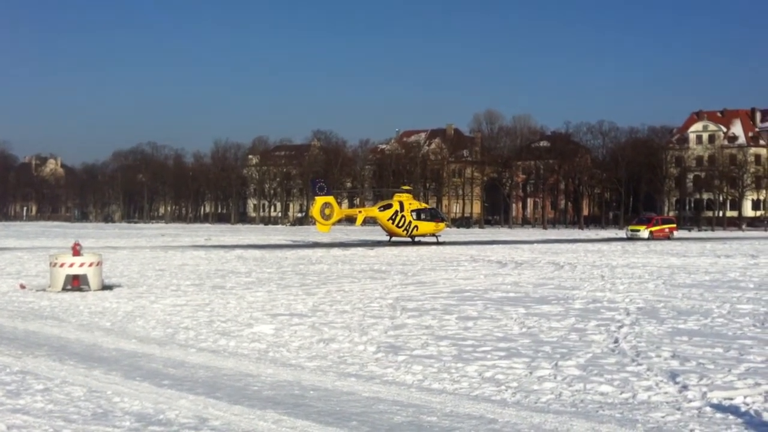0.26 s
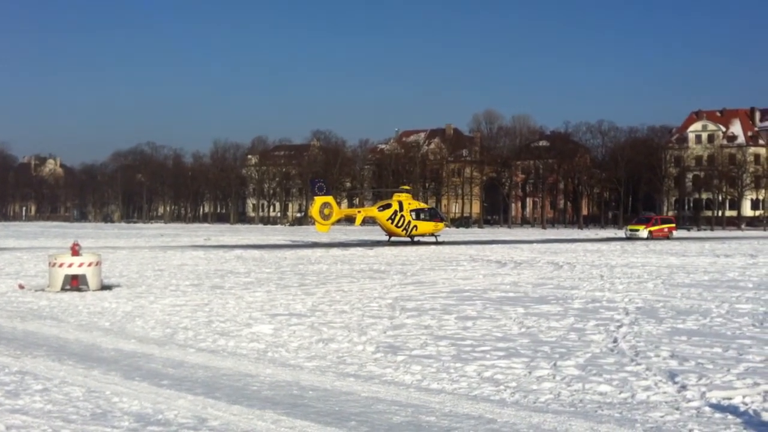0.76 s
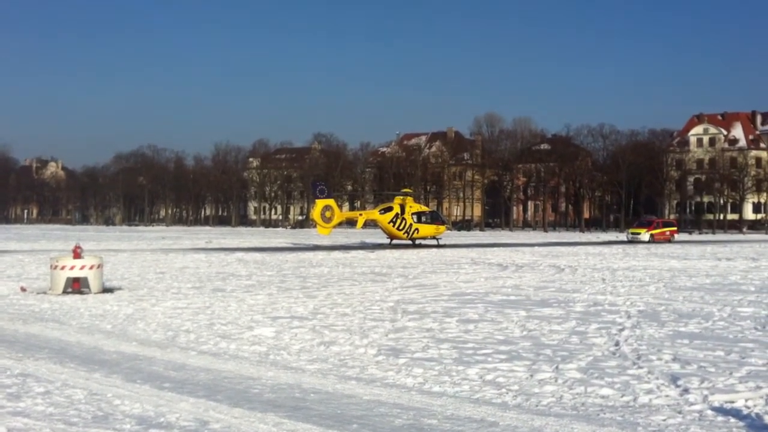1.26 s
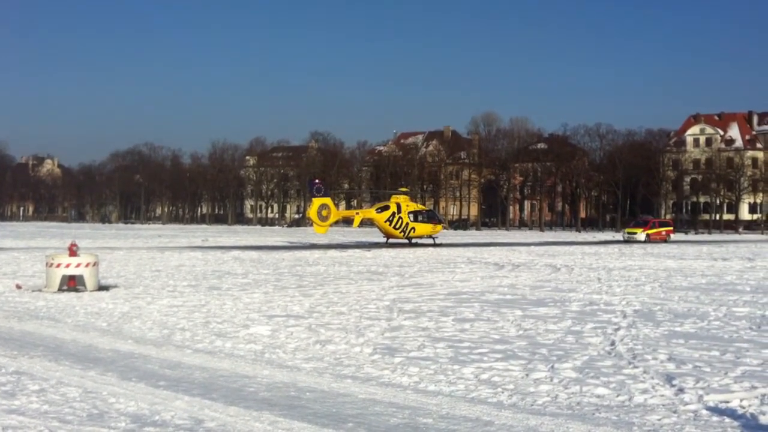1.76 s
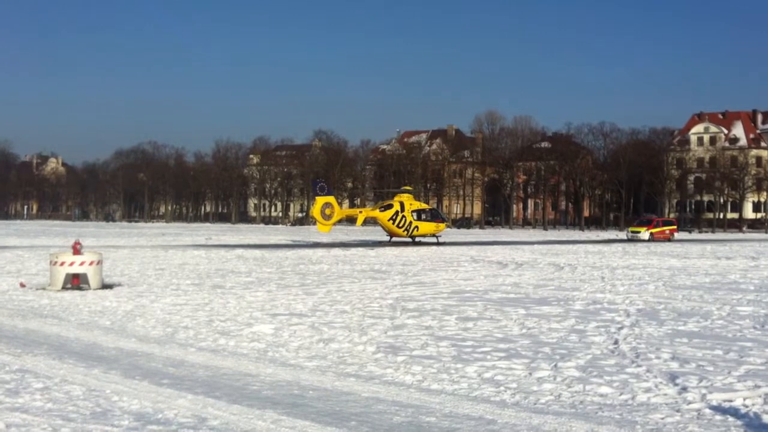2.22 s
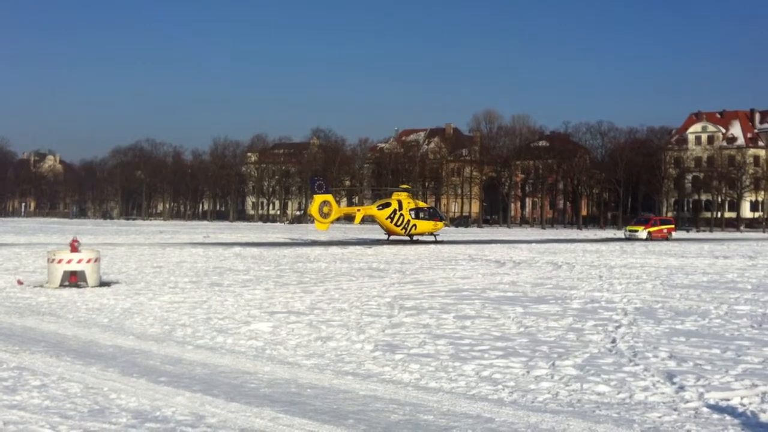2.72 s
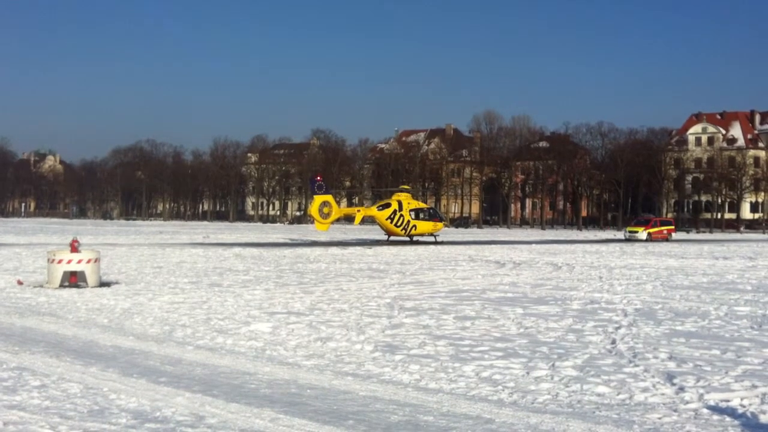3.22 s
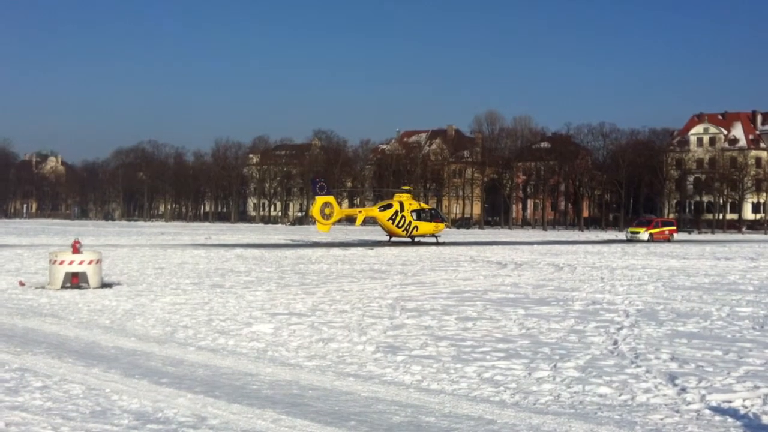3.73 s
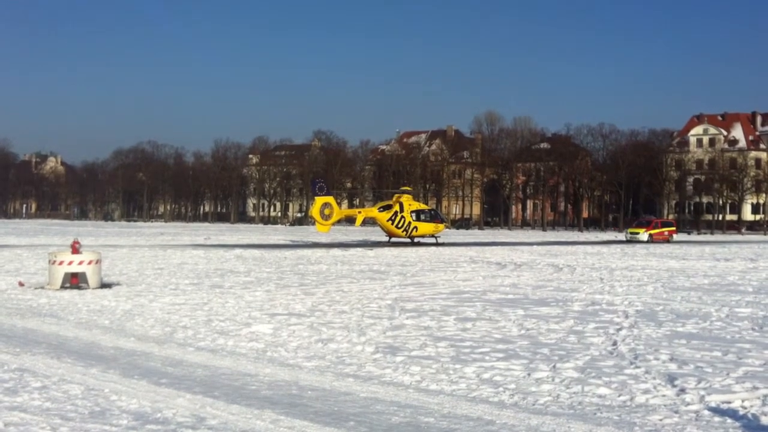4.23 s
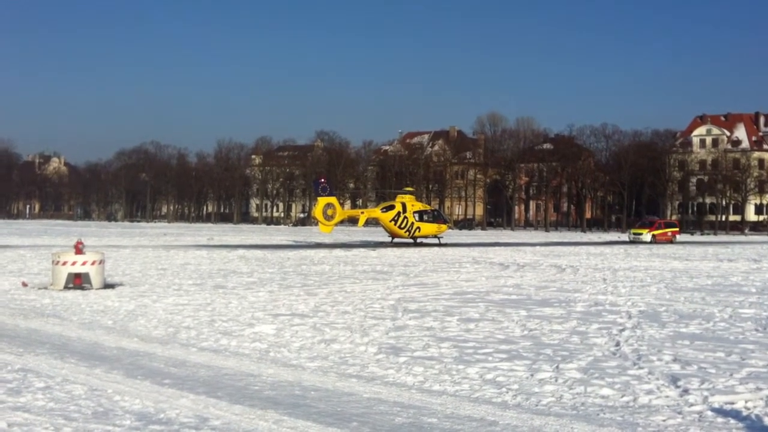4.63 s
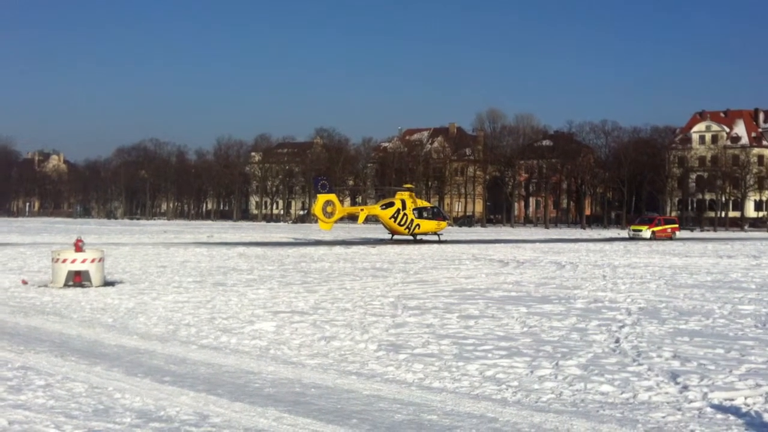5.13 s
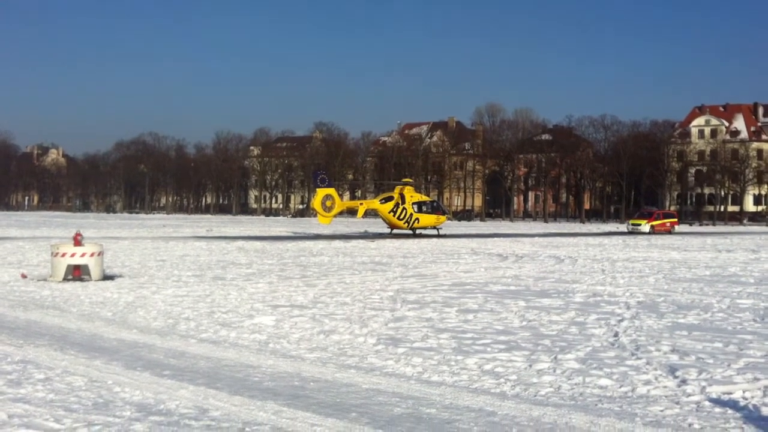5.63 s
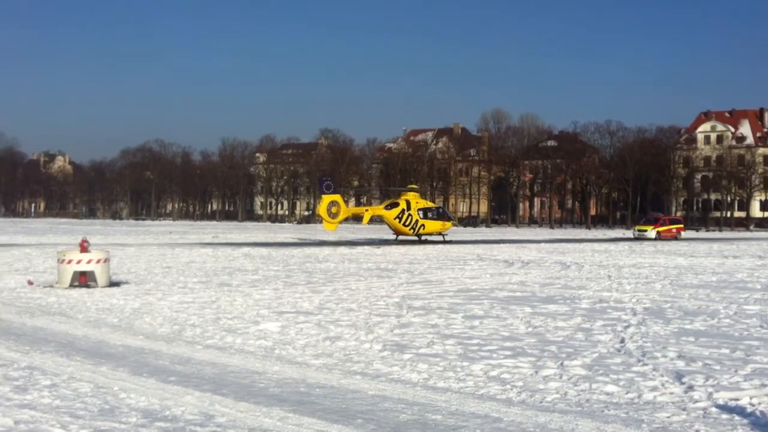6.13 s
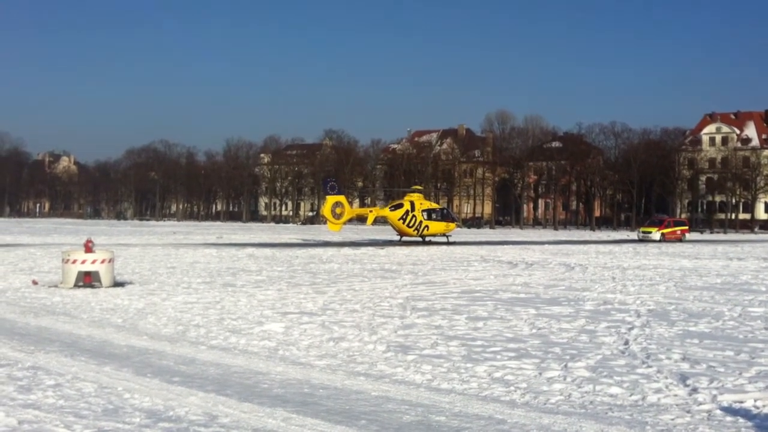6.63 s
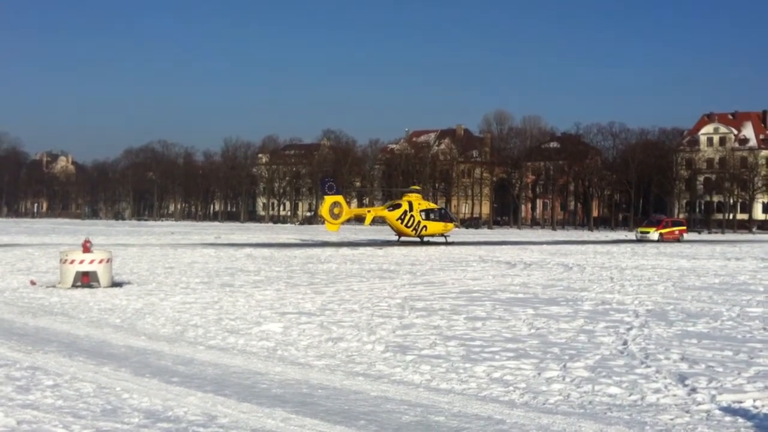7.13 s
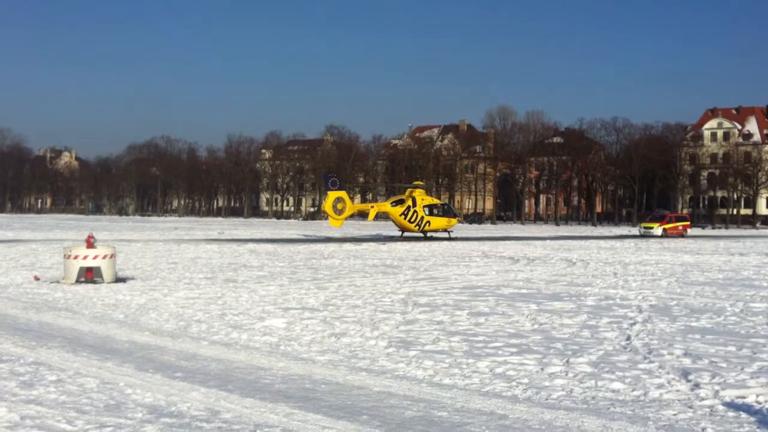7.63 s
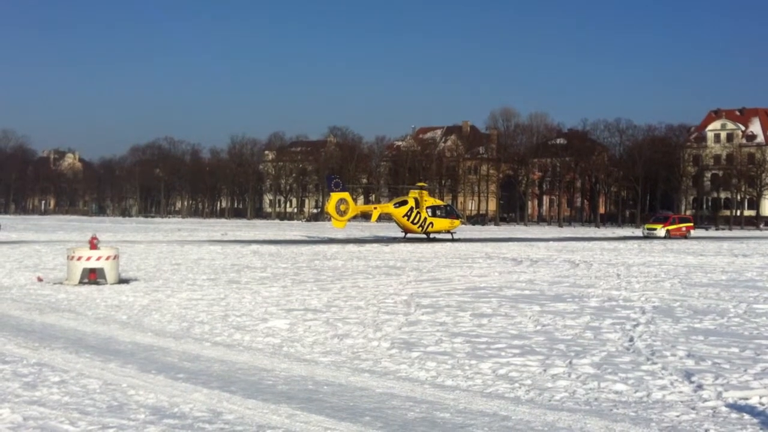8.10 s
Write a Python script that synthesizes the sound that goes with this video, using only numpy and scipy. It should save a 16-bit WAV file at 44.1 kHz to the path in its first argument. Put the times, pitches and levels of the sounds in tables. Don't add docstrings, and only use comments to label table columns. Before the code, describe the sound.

Far-off jet engine roar and hiss grow steadily as a helicopter winds up outdoors, with short low wind bumps in the second half.

```python
import sys
import numpy as np
from scipy import signal
from scipy.fft import rfft, irfft, next_fast_len
from scipy.io import wavfile
from scipy.ndimage import uniform_filter1d

SR = 44100
rng = np.random.default_rng(int(sys.argv[2]) if len(sys.argv) > 2 else 0)


def voltage_ratio(level):
    return 10 ** (np.asarray(level, float) / 20)


def digitize_waveform(pressure):
    field = np.atleast_2d(pressure).T
    bounded = np.clip(field, -1, 1)
    quanta = np.round(bounded * 32767).astype(np.int16)
    wavfile.write(sys.argv[1], SR, quanta)


N = 368676
T = np.arange(N) / SR
FROM_MIDDLE = (np.arange(N) - N / 2) / SR


def rms_one(x):
    return x / np.sqrt(np.mean(x ** 2) + 1e-20)


def in_time(rows):
    s, *columns = np.transpose(rows)
    return [np.interp(T, s, c) for c in columns]


def drift(rate):
    coarse = 40
    r = np.exp(-2 * np.pi * rate * coarse / SR)
    draws = rng.standard_normal(N // coarse + 2002)
    slow = signal.lfilter([1], [1, -2 * r, r * r], draws)[2000:]
    return np.interp(np.arange(N) / coarse, np.arange(len(slow)), rms_one(slow))


def air_noise(spectrum, shared_db, patchy_db, rate, count):
    size = next_fast_len(N)
    hz, db = np.transpose(spectrum)
    pitch = np.log(np.arange(1, size // 2 + 2) * SR / size)
    colour = rfft(rng.standard_normal(size)) * voltage_ratio(np.interp(pitch, np.log(hz), db, right=-120))
    along = (pitch - np.log(hz[1])) / np.log(hz[-2] / hz[1])
    place = np.clip(along, 0, 1) * (count - 1)
    together, out = drift(rate), 0
    for k in range(count):
        weight = np.clip(1 - abs(place - k), 0, 1)
        band = irfft(colour * weight, size)[:N]
        out = out + band * voltage_ratio(shared_db * together + patchy_db * drift(rate))
    return rms_one(out)


def tone(hz, level_db, flutter_db, wander_hz):
    phase = 2 * np.pi * np.cumsum(hz + wander_hz * drift(31.0)) / SR
    return np.sqrt(2) * voltage_ratio(level_db + flutter_db * drift(13.0)) * np.sin(phase)


def rumble():
    # (frequency [Hz], spectral density [dB per Hz])
    rumble_spectrum = [(12, -56), (20, -44), (27, -45), (38, -67), (91, -23), (126, -4), (150, 2),
                       (209, -3.5), (249, -13.5), (330, -8), (430, -82), (730, -120)]
    level_db = -48.5 + 0.48 * FROM_MIDDLE
    return voltage_ratio(level_db) * air_noise(rumble_spectrum, shared_db=-1.5, patchy_db=-1.64, rate=6.0, count=3)


def wind():
    # (frequency [Hz], spectral density [dB per Hz])
    wind_spectrum = [(12, -72), (20, -42), (59, -15), (116, 2), (160, 5), (255, 2), (327, -21), (400, -11),
                     (520, -37), (880, -120)]
    # (time of peak [s], level [dB], rise [s], fall [s])
    gusts = [(4.8, -50, .03, 0.082), (4.96, -35, .1, 0.071), (5.2, -39.5, 0.043, 0.026),
             (5.36, -42.5, 0.022, 0.069), (5.6, -37.5, 0.092, 0.15), (5.82, -42.5, .1, .03),
             (5.98, -37.5, .05, 0.027), (6.23, -45, 0.13, 0.072), (6.399, -39.5, 0.052, 0.046),
             (6.76, -59, 0.05, .03), (6.91, -45.5, .04, .03), (7.03, -46.5, 0.036, 0.036),
             (7.172, -32.5, 0.036, 0.055), (7.4, -72, 0.034, .3), (8.29, -70, .1, .15)]
    # (time [s], peak level [dB], frequency [Hz])
    buffets = [(4.772, -22, 242), (4.792, -24, 177), (4.835, -22.5, 237), (4.898, -26, 214),
               (4.975, -23, 206), (5.169, -20, 197), (5.178, -17.5, 262), (5.187, -22.5, 257),
               (5.211, -18, 229), (5.339, -10.5, 250), (5.348, -18.5, 250), (5.38, -22.5, 218),
               (5.404, -24, 176), (5.546, -24, 244), (5.621, -21.5, 230), (5.71, -20, 260),
               (5.756, -24.5, 245), (5.815, -19.5, 210), (5.958, -18.5, 305), (5.984, -19.5, 216),
               (6.374, -17.5, 231), (6.41, -22, 304), (7.02, -25, 274), (7.155, -22, 216),
               (7.171, -26, 198), (7.188, -34, 238), (7.205, -12, 210), (7.259, -24.5, 228),
               (8.284, -28.5, 230), (8.309, -25, 261)]
    edge_db = 8
    gust = 0
    for s, db, rise, fall in gusts:
        gust = gust + voltage_ratio(db - edge_db * np.maximum((s - T) / rise, (T - s) / fall))
    lumps = gust * air_noise(wind_spectrum, shared_db=2.0, patchy_db=0.5, rate=21.0, count=2)
    eddies = np.zeros(N)
    for (s, db, hz), turn in zip(buffets, rng.random(len(buffets))):
        cycles = np.arange(int(5 * SR / hz)) * hz / SR
        rise = 0.61
        swell = (cycles / rise * np.exp(1 - cycles / rise)) ** 2.5
        start = int((s - rise / hz) * SR)
        eddies[start:start + len(cycles)] += voltage_ratio(db) * swell * np.sin(2 * np.pi * (cycles + turn))
    port = signal.butter(3, 95.0, "high", fs=SR, output="sos")
    return lumps + signal.sosfilt(port, eddies)


def whine():
    # (time [s], tone spacing [Hz])
    spool = [(0.0, 3963.0), (1.19, 4221.2), (2.39, 4486.2), (3.58, 4767.7), (4.18, 4939.8), (4.78, 5137.0),
             (5.37, 5351.0), (5.97, 5579.5), (6.57, 5807.2), (7.17, 6025.7), (8.36, 6463.1)]
    # (frequency [Hz], level [dB])
    second_order = [(7930, -82), (8400, -69.5), (8700, -60.5), (9400, -53.5), (10000, -55.5), (11000, -62),
                    (12000, -59), (12900, -73)]
    third_order = [(11900, -78), (12700, -75), (13300, -73), (14000, -69), (14800, -61), (15300, -61),
                   (15700, -74), (16000, -110)]
    # (time [s], level change [dB], width [s])
    shimmer = [(1.08, -15, 0.047), (2.4, -46, 0.048), (3.0, 5.5, 0.053), (3.36, 10, 0.1), (4.1, 8.5, 0.078),
               (4.45, 12.5, 0.053), (4.95, -8.5, 0.098), (5.499, 17, .08), (5.76, 15, 0.057),
               (6.6, -10, 0.099), (6.82, 9, 0.085), (6.96, -21, 0.046), (7.68, -2, 0.054), (2.2, -0.5, .08)]
    spacing_hz, = in_time(spool)
    shimmer_db = sum(db * np.exp(-0.5 * ((T - s) / width) ** 2) for s, db, width in shimmer)
    second_db = np.interp(2 * spacing_hz, *np.transpose(second_order)) + shimmer_db
    third_db = np.interp(3 * spacing_hz, *np.transpose(third_order))
    second = tone(2 * spacing_hz, second_db, flutter_db=3.4, wander_hz=28.0)
    third = tone(3 * spacing_hz, third_db, flutter_db=4.0, wander_hz=30.0)
    power_hz = 8390 + 478 * T
    power_db = -59.5 - 48.5 * np.maximum(T - 1.9, 0)
    return second + third + tone(power_hz, power_db, flutter_db=3.0, wander_hz=15.0)


def intake():
    # (frequency [Hz], spectral density [dB per Hz])
    hiss_spectrum = [(4000, -52), (4400, -15), (4750, -2.5), (5240, -4), (6150, 3), (6710, -0.5),
                     (7200, -9.5), (7500, -16.5), (7730, -23), (8000, -15), (8300, -23), (8500, -50)]
    upper_spectrum = [(8150, -30), (8350, -5), (8600, -2), (9200, 0), (10200, -3), (10850, -9), (11300, -7),
                      (11850, -10), (12050, -18), (12400, -19), (12750, -12), (13000, -21), (13700, -22),
                      (14000, -36)]
    top_spectrum = [(13600, -32.5), (13880, -14), (14150, -4), (14900, -8), (15300, -4), (15600, -2),
                    (15800, -9), (16500, 0.5)]
    # (time [s], hiss level [dB])
    air_path = [(0.0, -49), (0.28, -45.5), (0.51, -46), (0.61, -43.5), (1.75, -42), (2.33, -46),
                (2.65, -42), (4.12, -42.5), (4.4, -40), (4.8, -43), (5.56, -38.5), (5.89, -41.5),
                (6.29, -41), (6.38, -37.5), (6.92, -41.5), (6.96, -38.5), (7.29, -40), (8.36, -38)]
    hiss_db, = in_time(air_path)
    swing_db = hiss_db - hiss_db.mean()
    upper_db = -55 + 0.89 * swing_db
    top_db = -64.5 + 0.76 * swing_db
    hiss = voltage_ratio(hiss_db + 0.55) * air_noise(hiss_spectrum, shared_db=-0.9, patchy_db=1.63, rate=3.4, count=4)
    upper = voltage_ratio(upper_db) * air_noise(upper_spectrum, shared_db=-0.2, patchy_db=1.0, rate=11.0, count=3)
    top = voltage_ratio(top_db) * air_noise(top_spectrum, shared_db=-0.5, patchy_db=1.0, rate=4.9, count=3)
    return hiss + upper + top


def exhaust():
    # (frequency [Hz], spectral density [dB per Hz])
    roar_spectrum = [(250, -42), (330, -21), (395, -17.5), (540, -5.5), (650, -7.5), (740, -0.5),
                     (860, 1.5), (950, -2.5), (1100, -7.5), (1230, -4), (1325, 1.5), (1430, -3),
                     (1590, -5.5), (1700, -15.5), (2100, -42)]
    duct_spectrum = [(1500, -49), (1700, 3.5), (1830, 4.5), (1930, 10), (2060, 5.5), (2190, 4.5),
                     (2320, -7.5), (2500, -34)]
    upper_spectrum = [(1350, -30), (2300, 2), (2760, -1), (3240, -9.5), (3630, -24), (4400, -22.5),
                      (5720, -60), (9680, -120)]
    fizz_spectrum = [(6500, -40), (7400, 2), (13900, -3), (14500, -40)]
    # (time [s], roar level [dB], brightness [dB])
    thrust = [(0.0, -33.5, -9), (0.3, -32, -5), (0.32, -32, -9.5), (0.7, -31.5, -4), (2.44, -29, -8),
              (3.54, -30, -6), (4.26, -27, -7.5), (4.58, -26, -9.5), (4.61, -31, -5), (4.65, -27, -9),
              (5.7, -24.5, -4.5), (5.8, -25.5, -6), (6.4, -23, -7.5), (6.45, -25.5, -4.5),
              (6.87, -24.5, -4.5), (6.99, -23, -7), (7.66, -25, -2), (8.36, -24, -3.5)]
    roar_db, bright_db = in_time(thrust)
    mean_db = bright_db.mean()
    duct_db = roar_db + mean_db - 3 + 0.87 * (bright_db - mean_db) + 0.76 * FROM_MIDDLE
    upper_db = roar_db + bright_db - 2 - 0.45 * FROM_MIDDLE
    fizz_db = roar_db - 38 + 1.7 * FROM_MIDDLE
    roar = voltage_ratio(roar_db + 0.57) * air_noise(roar_spectrum, shared_db=0.17, patchy_db=0.54, rate=4.3, count=4)
    duct = voltage_ratio(duct_db) * air_noise(duct_spectrum, shared_db=0.5, patchy_db=0.5, rate=6.0, count=2)
    fizz = voltage_ratio(fizz_db) * air_noise(fizz_spectrum, shared_db=2.5, patchy_db=2.5, rate=5.5, count=4)
    upper = voltage_ratio(upper_db) * air_noise(upper_spectrum, shared_db=1.18, patchy_db=0.04, rate=2.7, count=3)
    return roar + duct + fizz + upper


def scene():
    return (rumble() + wind() + whine() + intake() + exhaust())[None]


def camera_storage(x):
    # (frequency [Hz], step level [dB])
    camera_step = [(250, -42), (900, -27), (2400, -28), (3800, -40), (5200, -32), (6300, -31), (7600, -41),
                   (9000, -37), (11800, -43.5), (13500, -43.5), (14300, -47.5), (15800, -45)]
    hop, offset, top_hz = 1024, 421, 15775
    n, k = np.arange(2 * hop)[:, None] + 0.5, np.arange(hop) + 0.5
    window = np.sin(np.pi * n / (2 * hop))
    basis = np.sqrt(2 / hop) * window * np.cos(np.pi / hop * (n + hop / 2) * k)
    lead = 2 * hop - offset
    blocks = np.pad(x, (lead, 3 * hop - (N + lead) % hop)).reshape(-1, hop)
    lines = np.hstack([blocks[:-1], blocks[1:]]) @ basis
    hz = k * SR / (2 * hop)
    group_db = np.repeat(rng.standard_normal((len(lines), hop // 32)), 32, axis=1)
    table_hz, table_db = np.transpose(camera_step)
    step_db = np.interp(np.log(hz), np.log(table_hz), table_db)
    near_db = uniform_filter1d(10 * np.log10(lines ** 2 + 1e-9), size=128)
    near_db = uniform_filter1d(near_db, size=3, axis=0)
    masked_db = near_db - near_db.mean(axis=0)
    step = voltage_ratio(step_db + 0.95 * masked_db + 0.7 * group_db)
    whole = np.floor((abs(lines) / step) ** 0.75 + 0.4054)
    kept = np.sign(lines) * whole ** (4 / 3) * step * (hz < top_hz)
    frames = kept @ basis.T
    joined = frames[1:, :hop] + frames[:-1, hop:]
    return joined.ravel()[lead - hop:][:N]


def low_pass(x):
    return signal.sosfilt(signal.butter(12, 16560, fs=SR, output="sos"), x)


def record(dry):
    bass_cut = signal.butter(2, 45.0, "high", fs=SR, output="sos")
    thin = signal.sosfilt(bass_cut, dry)
    mix = camera_storage(thin[0])[None]
    return low_pass(mix)


dry = scene()
out = record(dry)
digitize_waveform(out)
```